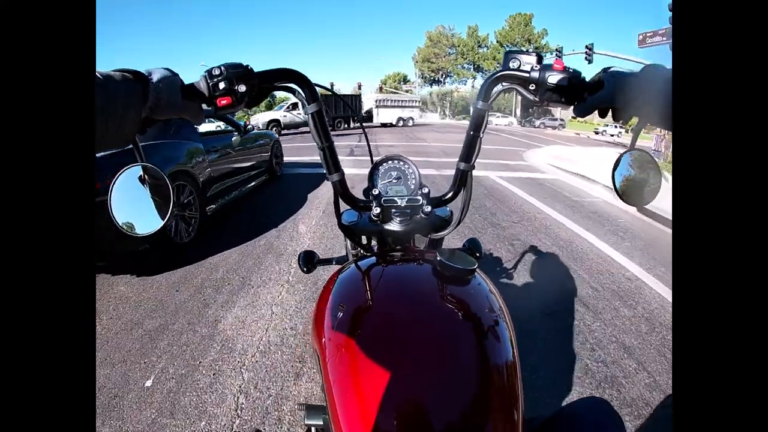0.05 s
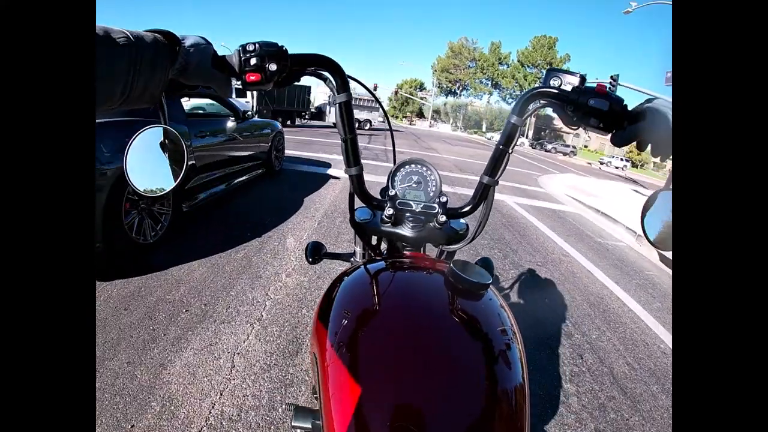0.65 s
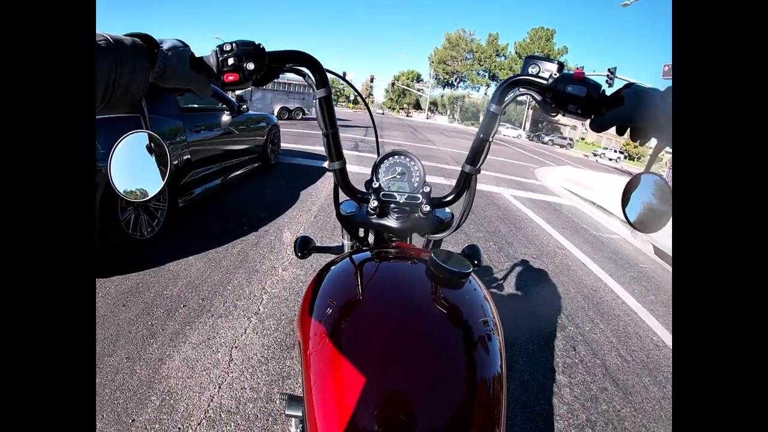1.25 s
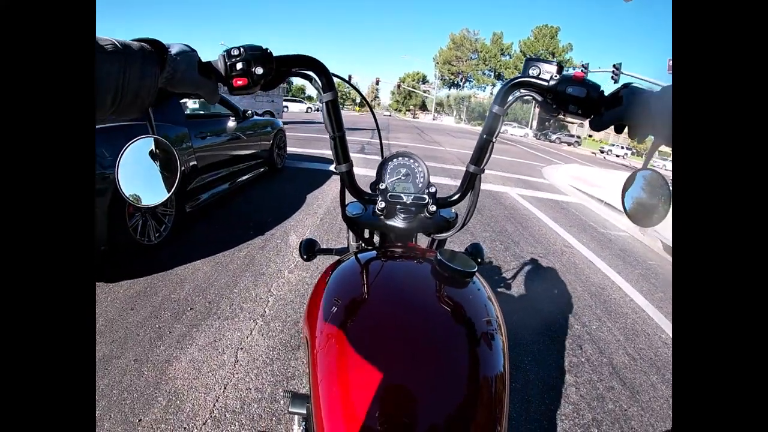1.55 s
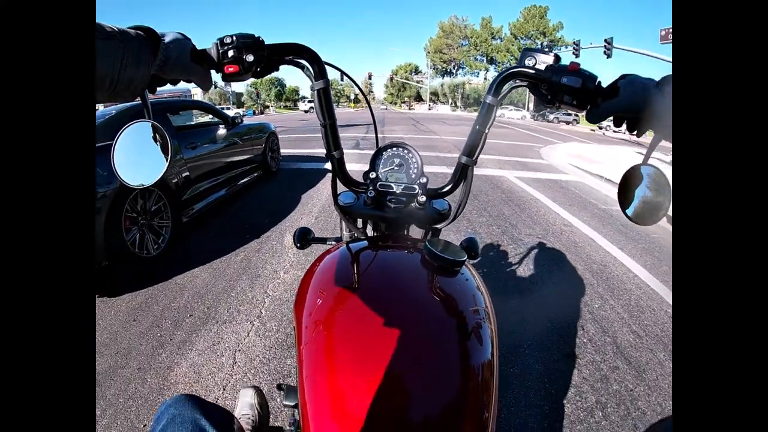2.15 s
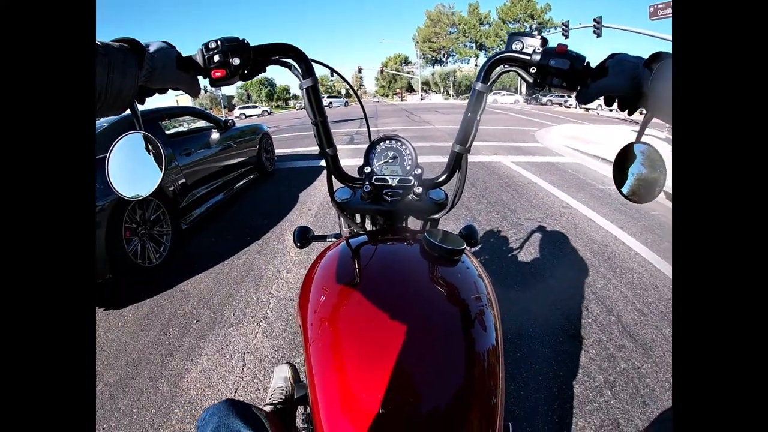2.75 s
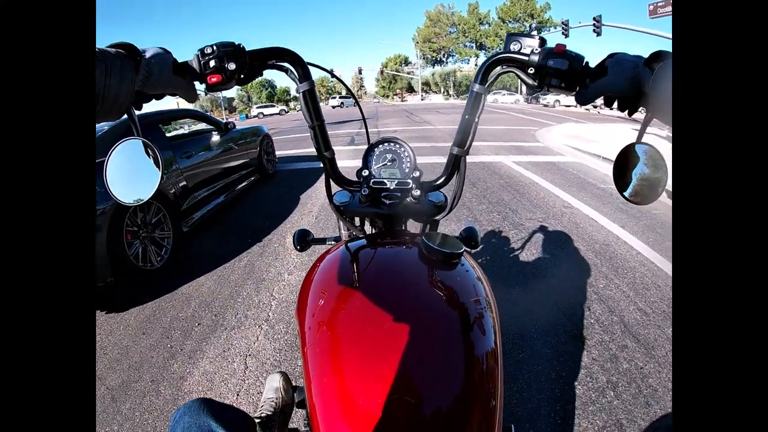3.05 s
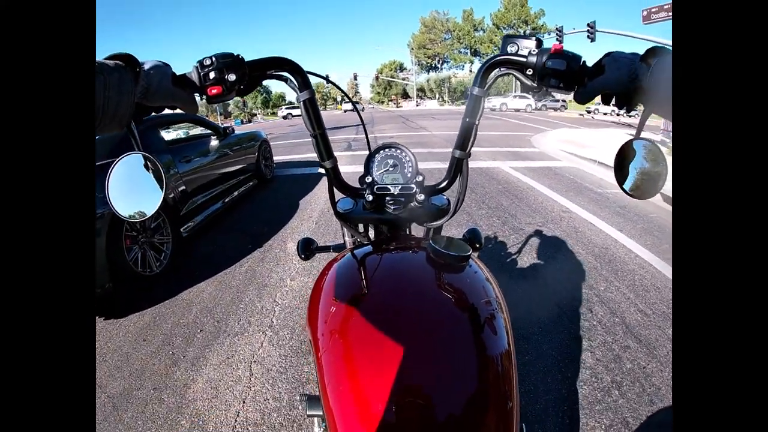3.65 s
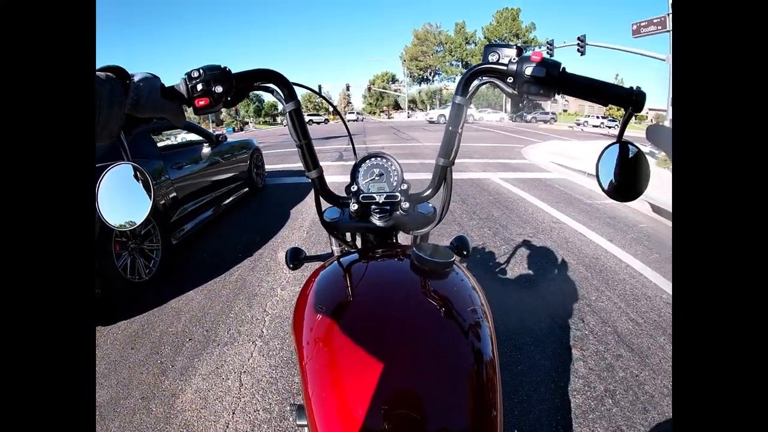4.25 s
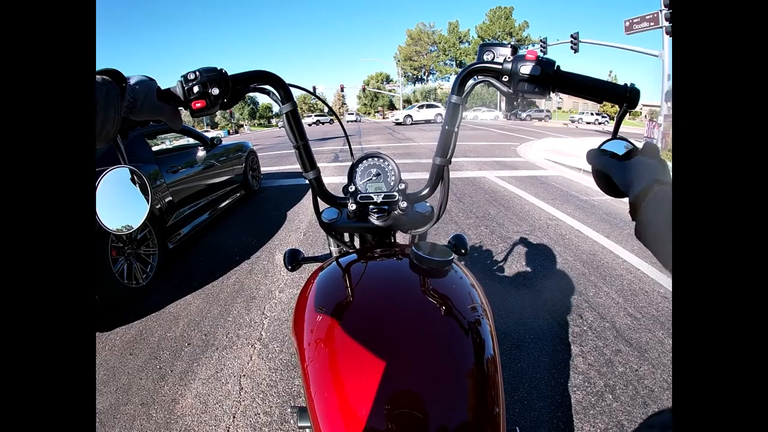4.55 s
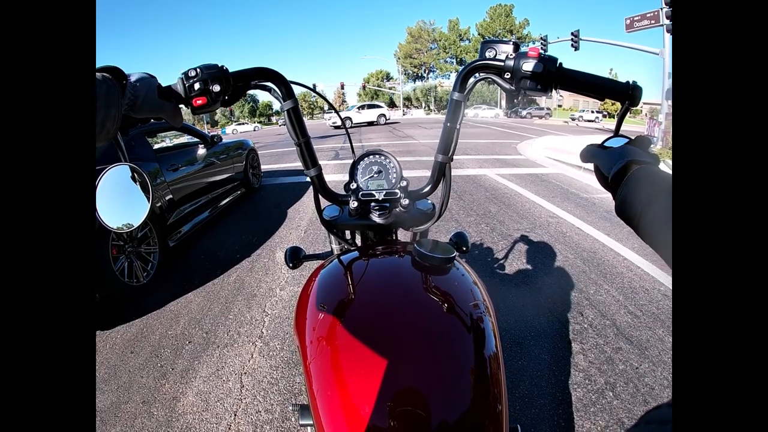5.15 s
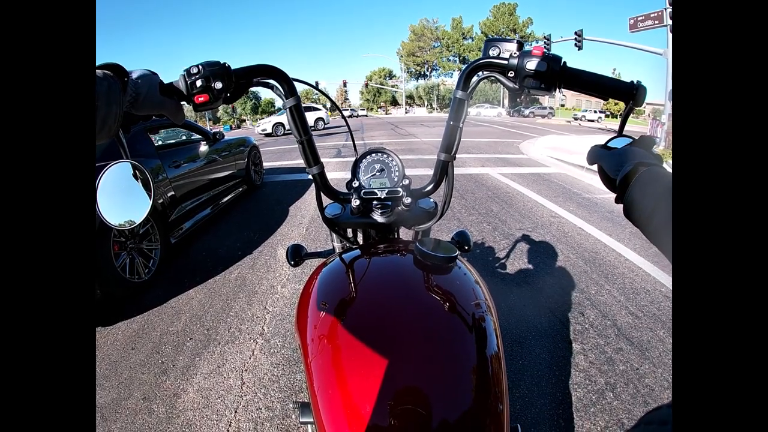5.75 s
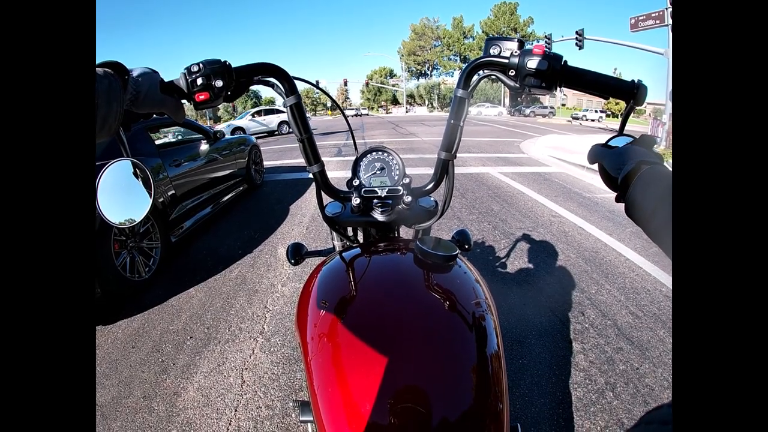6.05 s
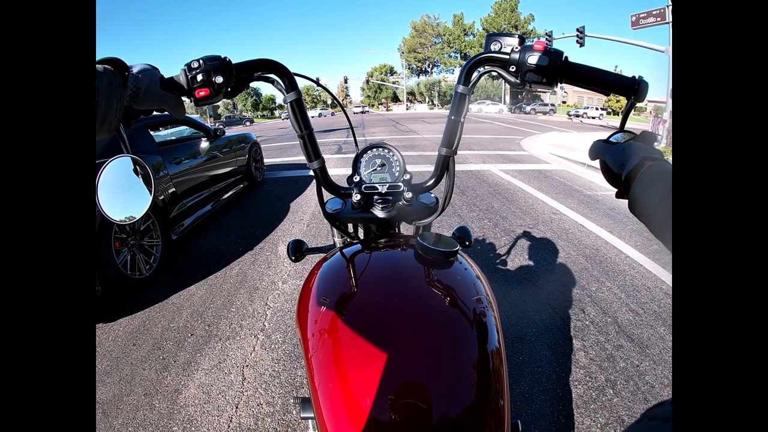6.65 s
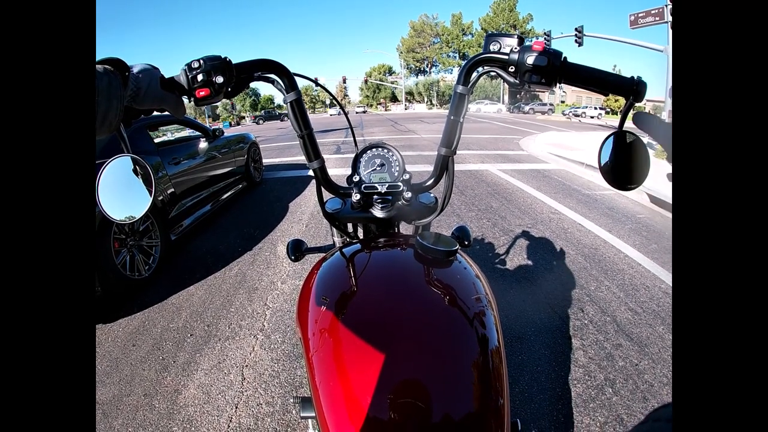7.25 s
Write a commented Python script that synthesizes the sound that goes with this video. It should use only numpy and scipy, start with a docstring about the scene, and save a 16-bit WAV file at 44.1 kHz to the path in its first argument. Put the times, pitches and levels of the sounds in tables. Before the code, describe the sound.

Heard from the rider's seat outdoors, a motorcycle engine idles throughout with a deep, lumpy beat, light metallic chatter and the odd harder firing. A faint brake ring fades as the bike stops, and the gear lever clicks about two seconds in. Shortly after, another vehicle pulls away with a brief rising drone. Underneath are the low hum of a neighbouring car and a soft wash of crossing traffic.

```python
"""A motorcycle stops at a junction

A V-twin motorcycle rolls the last metres and idles, heard from the rider's chest. Uneven pairs of
firings ring the exhaust pipe, the engine gulps air between them, gas rumbles in the silencer,
valves tick and gears chatter. A brake sings faintly, the fuel pump whines and the gear lever clicks.
A car idles in the next lane while others cross the junction."""
import sys
import numpy as np
from scipy import signal
from scipy.fft import rfft, irfft
from scipy.io import wavfile
from scipy.ndimage import uniform_filter1d, minimum_filter1d

SR = 44100
rng = np.random.default_rng(int(sys.argv[2]) if len(sys.argv) > 2 else 0)


def transcribe(signal):
    """Save signal, clipped to [-1, 1], as a 16-bit WAV file at the path in sys.argv[1]."""
    frames = np.atleast_2d(signal).T
    limited = np.clip(frames, -1, 1)
    pcm = np.round(limited * 32767).astype(np.int16)
    wavfile.write(sys.argv[1], SR, pcm)


N = 331191
T = np.arange(N) / SR
HZ = np.maximum(np.fft.rfftfreq(N, 1 / SR), .01)

# Below, level_db is an average (rms) level, and gain_db only turns something up or down.
# A cycle_share is a place in one engine cycle, from 0 to 1.

# tone of the wash of tyres and traffic: pitch_hz, gain_db
ROAD_TONE = [(15, -10.5), (45, 4), (130, 11.5), (450, 5), (600, 1.5), (680, -0.5), (770, 2.5), (860, -6),
             (1500, -11.5), (10000, -67.5)]
# tyres crossing the junction: nearest_s, swell_s, level_db when nearest, pitch_hz, width_hz
PASSING_TYRES = [(1.1, 0.75, -50.5, 803, 132), (3.401, 0.5, -46.5, 649, 169.6)]
# drone of a vehicle pulling away: time_s, pitch_hz, level_db
PULL_AWAY_DRONE = [(2.5, 150.4, -68), (2.9, 161, -34.5), (3.3, 174, -34.5), (3.6, 186, -53.5),
                   (3.9, 176, -66)]
# engine speed of the idling car: time_s, cycles_per_s
CAR_SPEED = [(0, 6.47), (1.8, 6.43), (2.6, 6.27), (3.4, 6.22), (5.2, 6.28), (5.9, 6.45), (6.3, 6.28),
             (7.5, 6.28)]
# tones in that car's hum: multiple of its speed, level_db
CAR_TONES = [(4, -39), (6, -37), (9, -37), (12, -25.5), (18, -31), (21, -38)]
# singing of the brake disc: time_s, level_db
BRAKE_LEVEL = [(0, -68.5), (.55, -67.5), (.8, -72), (1.1, -71), (1.4, -75), (2, -74), (2.2, -69.5),
               (2.55, -69.5), (2.8, -90)]
# rings of a small steel part: pitch_hz, width_hz, gain_db
STEEL_RINGS = [(3618, 13, -88), (4032, 45, -104), (4107, 9, -98)]
# moves of the gear lever: start_s, click_gain_db, scrape_gain_db, thud_gain_db
LEVER_MOVES = [(1.8453, -9.7, -20, -19), (2.627, -60, -25, -19)]
# rings of the lever: pitch_hz, width_hz, gain_db
LEVER_RINGS = [(2700, 400, -15), (3030, 80, 1), (3800, 900, -4), (4750, 830, -9), (5650, 580, 0.5),
               (7740, 450, -10), (10000, 440, -8), (12200, 600, 2)]
# load on the gears and chain: cycle_share, gain_db
GEAR_LOAD = [(0.021, -0.5), (.1, 0), (.15, 3.5), (.2, -1.2), (.27, 2), (.35, 0), (.42, 3.5), (.58, -1.5),
             (.71, -3), (.75, 1.5), (.8, -1.1), (.88, 0.1)]
# clinks of loose parts: start_s, gain_db against the steady chatter
LOOSE_CLINKS = [(.86, -11), (1.222, -12), (3.261, -12), (3.645, -9)]
# tone of the gear and chain chatter: pitch_hz, gain_db
CHATTER_TONE = [(300, -19), (900, -9), (1150, -1.5), (1700, -1), (2050, -6), (2800, -7), (3700, -11.5),
                (4500, -16.5), (6350, -20.5), (7100, -29), (10000, -37), (13000, -53.5)]
# rings of the engine covers: pitch_hz, width_hz, gain_db
COVER_RINGS = [(1012, 43, 2.5), (1367, 24, 4.5), (1495, 28, -2), (1780, 45, -2), (2200, 80, -5),
               (2545, 55, -.5), (3170, 40, -5), (3320, 60, -7), (3680, 60, -6), (4130, 70, -10.5)]
# two close rings of one whirring cover: pitch_hz, width_hz, gain_db
WHIR_RINGS = [(1578, 26, 0), (1636, 34, -1)]
# loudness of that whir: time_s, level_db
WHIR_LEVEL = [(0, -66.5), (2.6, -60.5), (3.0, -57.5), (3.7, -54.5), (4.3, -64.5), (5.4, -53), (5.9, -59.5),
              (7.5, -63)]
# valves snapping shut: cycle_share, gain_db
VALVE_TAPS = [(.02, -1.5), (.34, -5.5), (.64, -7), (.703, -3.5)]
# rings of the cylinder heads: pitch_hz, width_hz, gain_db
HEAD_RINGS = [(3650, 4100, -6), (6200, 2400, -5.5), (7630, 120, 9), (8090, 86, 3.5), (8750, 90, -2.5),
              (9300, 140, 1), (9700, 150, -4), (10050, 130, -5.5), (11240, 220, 0), (11850, 130, -4),
              (12600, 200, -8.5)]
# rings of the air box: pitch_hz, width_hz, gain_db
AIR_BOX_RINGS = [(28, 730, -59.5), (59.9, 7, -44)]
# hard firings that bark: start_s, gain_db
HARD_FIRINGS = [(.331, -2), (0.752, -1), (1.165, -5), (1.712, 2.5), (3.189, -1), (3.533, 2.5), (4.623, -2),
                (4.7401, 2), (5.084, 2.5), (5.534, -2), (5.712, 1.5), (7.129, 0), (7.364, 1)]
# hollow rings of the silencer: pitch_hz, width_hz, gain_db
SILENCER_RINGS = [(227, 18, -75.5), (316.8, 24, -61.5), (372, 18, -77)]
# tone of the gas leaving the silencer: pitch_hz, gain_db
RUMBLE_TONE = [(40, -17), (90, -5.5), (120, -1), (150, -1), (190, -6), (235, -2.5), (280, -0.5), (320, -1),
               (375, -7), (450, -10.5), (550, -25.5), (900, -42), (3000, -89.5)]
# rise and fall of that rumble: time_s, gain_db
RUMBLE_GAIN = [(0, -30), (1.7, -31.5), (2.2, -32.5), (3.1, -31.5), (3.5, -28.5), (4.35, -33), (4.7, -33.5),
               (5.45, -32), (5.8, -30.5), (7.5, -31)]
# extra thumps as the engine stumbles: start_s, gain_db against a firing
STUMBLE_THUMPS = [(1.312, -9), (2.535, -9), (5.077, -4), (6.247, -7.5), (6.382, -11)]
# rings of the exhaust pipe: pitch_hz, width_hz, gain_db
PIPE_RINGS = [(75.4, 15.8, -46.5), (94, 17, -47), (108.65, 11.3, -44), (157, 18, -60), (222.8, 38, -51.5)]
# when and how hard the two cylinders breathe out and in:
# exhaust_cycle_share, exhaust_gain_db, exhaust_jitter_s, puff_gain_db, intake_cycle_share, intake_gain_db
CYLINDERS = [(.07, 0.75, .0005, -2, .372, 0.14), (0.433, -0.03, .0008, -1, .73, -0.5)]
# the motorcycle's crank speed, wandering around idle: time_s, turns_per_minute
CRANK_SPEED = [(0.0, 974.3), (0.87, 975.5), (1.02, 1001.0), (1.77, 977.0), (2.0, 1019.1), (2.21, 955.7),
               (3.58, 992.1), (3.71, 978.4), (4.5, 1039.7), (5.78, 962.1), (6.04, 1048.4), (6.72, 958.0),
               (7.0, 1074.5), (7.51, 983.0)]


def undb(db):
    """Turn decibels into a gain."""
    return 10 ** (np.asarray(db) / 20)


def level(x, db):
    """Scale x to an average (rms) level."""
    return x * undb(db) / np.sqrt(np.mean(x ** 2))


def curves(table):
    """Join a table's points with straight lines: one curve for each column after the time."""
    times, *columns = np.transpose(table)
    return [np.interp(T, times, column) for column in columns]


def noise():
    """An even hiss: white noise."""
    return rng.standard_normal(N)


def wander(rate_hz):
    """A smooth random wobble, about 1 in size, with rate_hz new values a second."""
    hold = int(SR / rate_hz)
    steps = np.repeat(rng.standard_normal(N // hold + 1), hold)
    return level(uniform_filter1d(uniform_filter1d(steps, hold), hold)[:N], 0)


def ring(x, rings):
    """Let x ring at each (pitch_hz, width_hz, gain_db); narrow rings last longer."""
    response = sum(undb(db) / (1 + 1j * (HZ ** 2 - hz ** 2) / (HZ * width)) for hz, width, db in rings)
    return irfft(rfft(x) * response, N)


def soften(x, hz):
    """Dull the sound above hz."""
    return signal.sosfilt(signal.butter(2, hz, fs=SR, output="sos"), x)


def colour(x, tone):
    """Shape the tone of x through (pitch_hz, gain_db) points."""
    hz, db = np.transpose(tone)
    return irfft(rfft(x) * undb(np.interp(np.log(HZ), np.log(hz), db)), N)


def kicks(times, db):
    """Spikes one sample long; db sets the area of each."""
    out = np.zeros(N)
    inside = (times > 0) & (times < T[-1])
    np.add.at(out, (times[inside] * SR).astype(int), SR * undb(db)[inside])
    return out


def strokes(cycle, share, db, scatter_db, jitter_s):
    """One kick per engine cycle at the given share of it, each a little off in time and strength."""
    places = np.arange(int(cycle[-1]) + 1) + share
    chance = rng.standard_normal((len(places), 2))
    times = np.interp(places, cycle, T, left=-1, right=-1)
    return kicks(times + jitter_s * chance[:, 0], db + scatter_db * chance[:, 1])


def fade(x, decay_s):
    """Give every kick a tail that dies away."""
    return signal.lfilter([1 / SR], [1, -np.exp(-1 / (decay_s * SR))], x)


def road_wash(still_db=-45, rolling_boost_db=1, stop_s=1.6, settle_s=0.33):
    """Tyres and traffic make a steady wash, a little louder until the bike stops rolling."""
    rolling = (1 - np.tanh((T - stop_s) / settle_s)) / 2
    wash = level(colour(noise(), ROAD_TONE), still_db + 6.97)
    return wash * undb(rolling_boost_db * rolling + 0.2 * wander(8.4))


def passing_tyres():
    """The tyre roar of each crossing vehicle swells as it nears and fades as it leaves."""
    out = np.zeros(N)
    for nearest_s, swell_s, db, hz, width in PASSING_TYRES:
        roar = ring(ring(noise(), [(hz, width, 0)]), [(hz, 2 * width, 0)])
        swell = np.exp(-.5 * ((T - nearest_s) / swell_s) ** 2)
        out += level(roar, db) * swell
    return out


def pulling_away():
    """A vehicle pulls away with a drone that climbs, then sags as it fades."""
    hz, db = curves(PULL_AWAY_DRONE)
    drone = np.sin(2 * np.pi * np.cumsum(hz) / SR)
    return level(drone, 0) * undb(db + 2 * wander(30))


def idling_car():
    """The car in the next lane hums with wavering tones at multiples of its engine speed."""
    cycles_per_s, = curves(CAR_SPEED)
    angle = 2 * np.pi * np.cumsum(cycles_per_s * (1 + 0.00603 * wander(3.906))) / SR
    hum = np.zeros(N)
    for multiple, db in CAR_TONES:
        tone = np.sin(multiple * angle + rng.uniform(0, 2 * np.pi))
        hum += level(tone * undb(2.5 * wander(5)), db)
    return hum


def fuel_pump(pitch_hz=5630, level_db=-80):
    """The fuel pump whines thinly, its speed wavering."""
    hz = pitch_hz * (1 + .002 * wander(25))
    whine = np.sin(2 * np.pi * np.cumsum(hz) / SR)
    return level(whine * undb(3 * wander(15)), level_db)


def brake(pitch_hz=5660, width_hz=63):
    """The pads rub the disc into a faint, rough ring that fades as the wheel stops."""
    db, = curves(BRAKE_LEVEL)
    singing = ring(noise(), [(pitch_hz, width_hz, 0)])
    return level(singing, 0) * undb(db + 3.3 * wander(30))


def steel_chink(start_s=1.235):
    """One light tap rings a small steel part as the bike slows."""
    return ring(kicks(np.array([start_s]), np.zeros(1)), STEEL_RINGS)


def gear_lever(bounce_s=.0011, rise_s=.003, decay_s=.0052):
    """The lever snaps over and bounces, then later settles with a scuff; the gearbox thuds each time."""
    times, click_db, scrape_db, thud_db = np.transpose(LEVER_MOVES)
    snap = kicks(times, click_db) + undb(-10) * kicks(times + bounce_s, click_db)
    click = ring(undb(-80.5) * snap, LEVER_RINGS)
    rub = fade(fade(kicks(times, scrape_db), decay_s), rise_s) / rise_s
    scrape = ring(noise() * rub, [(2900, 1200, -2), (5800, 890, -11.0)])
    thud = ring(soften(kicks(times, thud_db), hz=400), [(240, 60, -71)])
    return soften(soften(click + scrape, hz=7400), hz=7400) + thud


def cooling_fins(shaking, gain_db=-14, decay_s=.009):
    """The fins on the cylinders add a brief metal shimmer to whatever shakes them."""
    t = T[T < 7 * decay_s]
    tail = rng.standard_normal(len(t)) * np.exp(-t / decay_s)
    shimmer = signal.fftconvolve(shaking, tail / np.sqrt(np.sum(tail ** 2)))[:N]
    return (shaking + undb(gain_db) * shimmer) / np.hypot(1, undb(gain_db))  # just as loud overall


def clatter(cycle, chatter_db=-47.77, covers_db=-53.5):
    """Gear teeth and chain links chatter with the load, loose parts clink, and the engine covers ring."""
    share, load_db = np.transpose(GEAR_LOAD)
    load = undb(np.interp(cycle, share, load_db, period=1) + .3 * wander(60))
    force = load + fade(kicks(*np.transpose(LOOSE_CLINKS)), decay_s=0.023)
    chatter = colour(noise() * force, CHATTER_TONE)
    covers = ring(noise() * force ** 2, COVER_RINGS)
    covers = soften(soften(covers, hz=4800), hz=4800)
    whir = sum(ring(noise() * force ** 2, [one_ring]) for one_ring in WHIR_RINGS)
    whir_db, = curves(WHIR_LEVEL)
    return level(chatter, chatter_db) + level(covers, covers_db) + level(whir, 0) * undb(whir_db)


def valves(cycle, level_db=-72, decay_s=.0027):
    """Closing valves briefly rattle the cylinder heads; each grows louder and softer with its slack."""
    taps = np.zeros(N)
    for share, db in VALVE_TAPS:
        taps += strokes(cycle, share, db, scatter_db=1.6, jitter_s=.0012) * undb(1.2 * wander(3))
    rattle = noise() * fade(fade(taps, decay_s), decay_s)
    return level(soften(ring(rattle, HEAD_RINGS), hz=9200), level_db)


def intake(cycle):
    """Each cylinder gulps air and sets the air in the air box swinging."""
    gulps = sum(strokes(cycle, share, db, scatter_db=1.1, jitter_s=.0006) for *_, share, db in CYLINDERS)
    return ring(soften(gulps, hz=73.5), AIR_BOX_RINGS)


def barks():
    """Now and then a harder firing sets the silencer ringing with a hollow bark."""
    hollow = ring(kicks(*np.transpose(HARD_FIRINGS)), SILENCER_RINGS)
    return ring(hollow, [(310, 120, 0.0039)])


def gas_rumble(puffs, round_trip_hz=46.1, reflection=.33):
    """Swirling gas rumbles in the silencer, surging with each puff and echoing along the pipe."""
    gas = noise() * (fade(puffs, decay_s=0.012) + .5)
    echoing = irfft(rfft(gas) / (1 - reflection * np.exp(-2j * np.pi * HZ / round_trip_hz)), N)
    gain_db, = curves(RUMBLE_GAIN)
    return level(colour(echoing, RUMBLE_TONE), 3.12) * undb(gain_db)


def exhaust(cycle):
    """Each firing lets out a burst of gas that thumps the pipe; sloshes and stumbles blur the beat."""
    firings, puffs = np.zeros(N), np.zeros(N)
    for share, db, jitter_s, puff_db, _, _ in CYLINDERS:
        bursts = strokes(cycle, share, db, scatter_db=1.36, jitter_s=jitter_s)
        firings += bursts
        puffs += bursts * undb(puff_db)
    # between firings, gas sloshes back in the pipe, never the same twice
    slosh = strokes(cycle, share=.97, db=-17.5, scatter_db=3.5, jitter_s=.009)
    stumbles = kicks(*np.transpose(STUMBLE_THUMPS))
    thumps = -ring(soften(firings + slosh + stumbles, hz=84.5), PIPE_RINGS)
    return thumps + gas_rumble(puffs)


def scene():
    """Mix bike and traffic. One engine cycle takes two turns of the crank and sets the bike's beat."""
    turns_per_minute, = curves(CRANK_SPEED)
    cycle = .3636 + np.cumsum(turns_per_minute) / (2 * 60 * SR)  # counts cycles, starting partway in
    engine = exhaust(cycle) + barks() + intake(cycle) + cooling_fins(valves(cycle) + clatter(cycle))
    small_parts = fuel_pump() + brake() + steel_chink() + gear_lever()
    traffic = idling_car() + pulling_away() + road_wash() + passing_tyres()
    return (engine + small_parts + traffic)[None]


def record(dry, threshold_db=-8, ratio=4, top_hz=13000):
    """A fast limiter turns the loudest thumps down to near one height; the highest treble is cut."""
    threshold = undb(threshold_db)
    gain = (threshold / np.maximum(np.abs(dry), threshold)) ** (1 - 1 / ratio)
    gain = uniform_filter1d(minimum_filter1d(gain, size=441), size=441)  # hold and smooth over 10 ms
    return signal.sosfilt(signal.ellip(8, .2, 70, top_hz, fs=SR, output="sos"), dry * gain)


dry = scene()
out = record(dry)
transcribe(out)
```